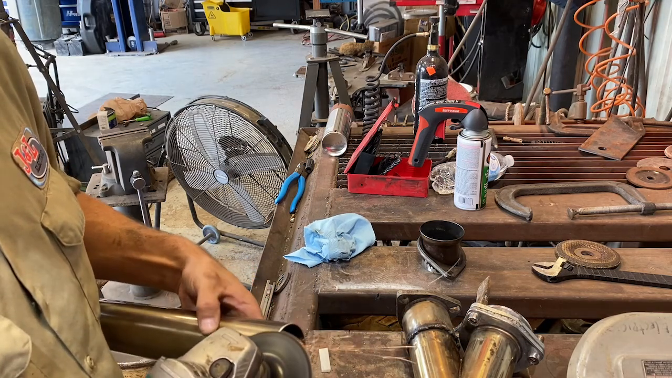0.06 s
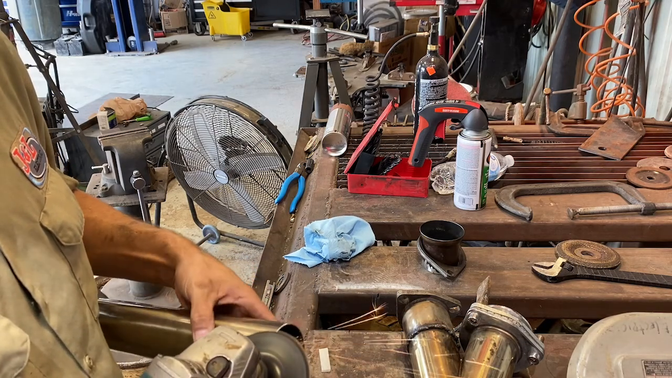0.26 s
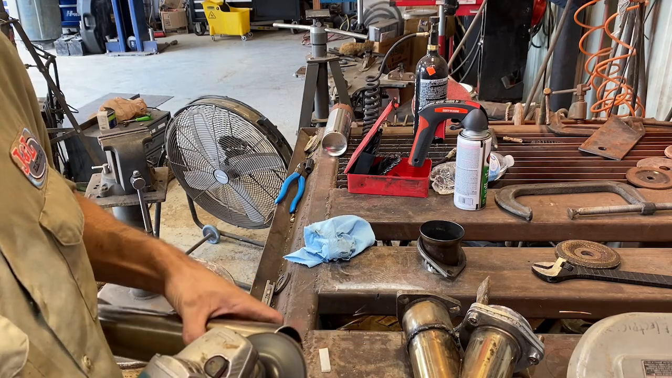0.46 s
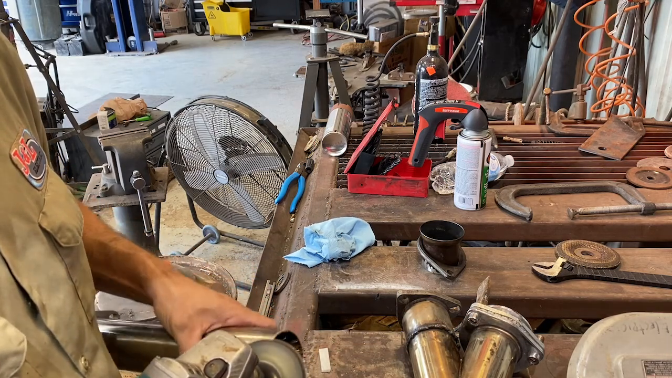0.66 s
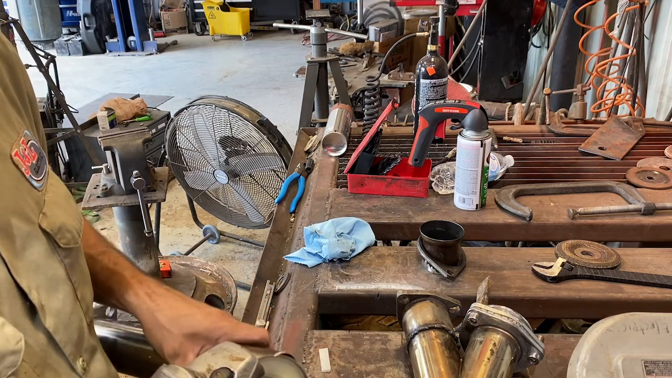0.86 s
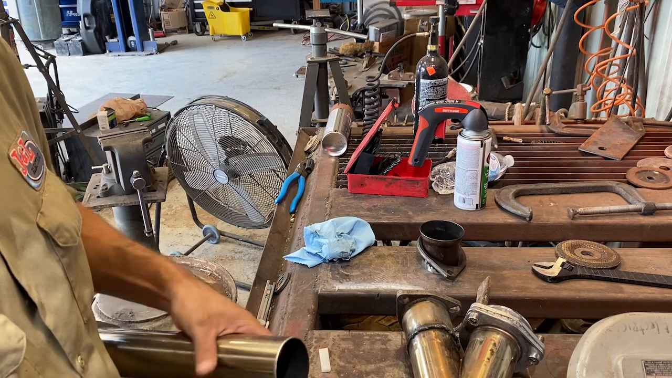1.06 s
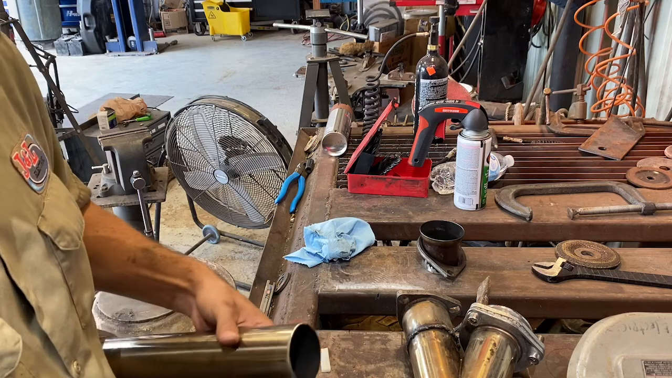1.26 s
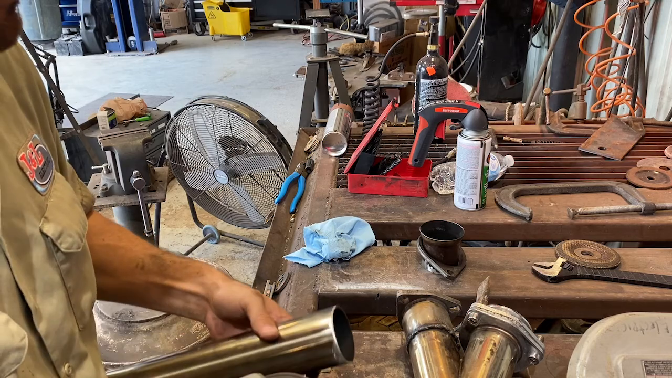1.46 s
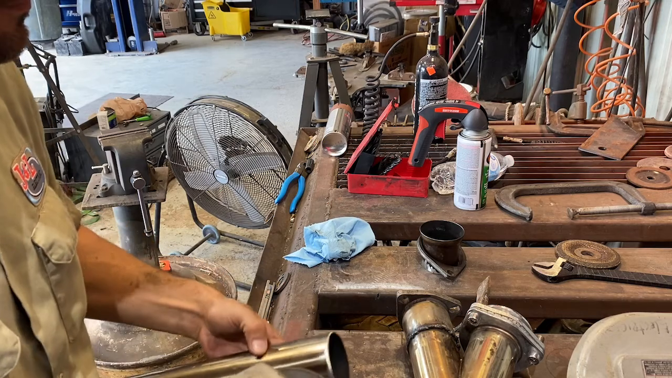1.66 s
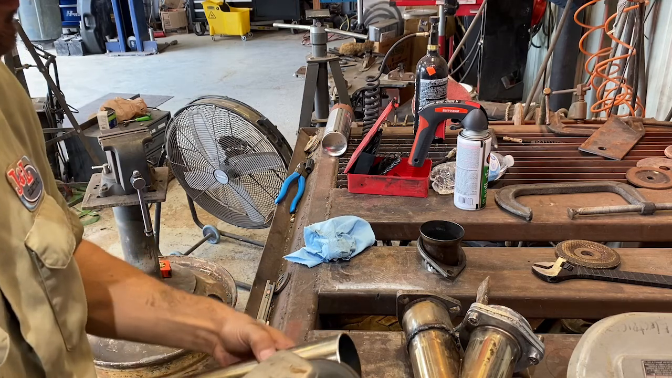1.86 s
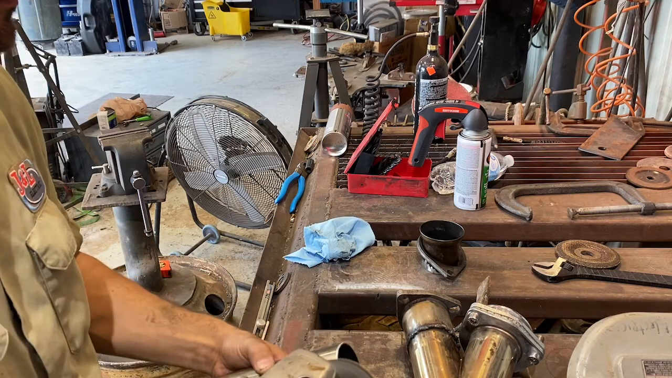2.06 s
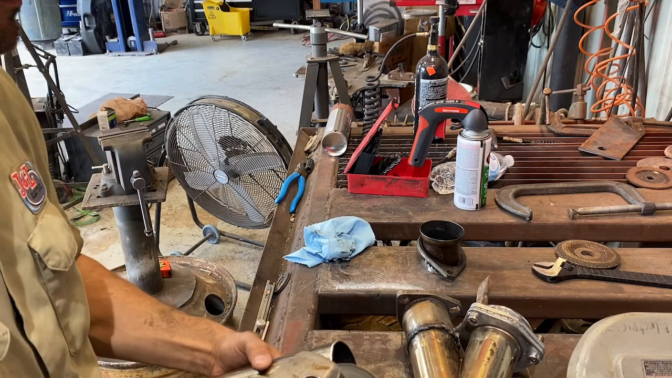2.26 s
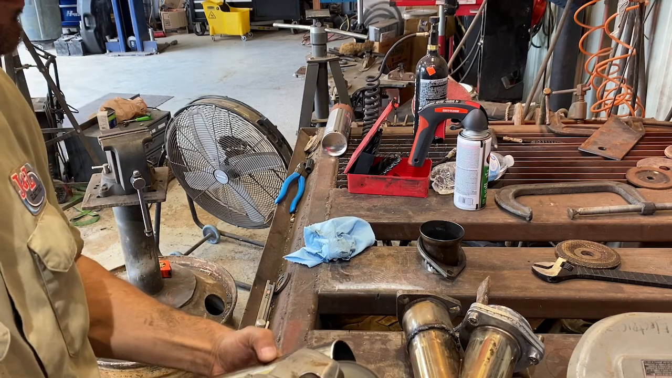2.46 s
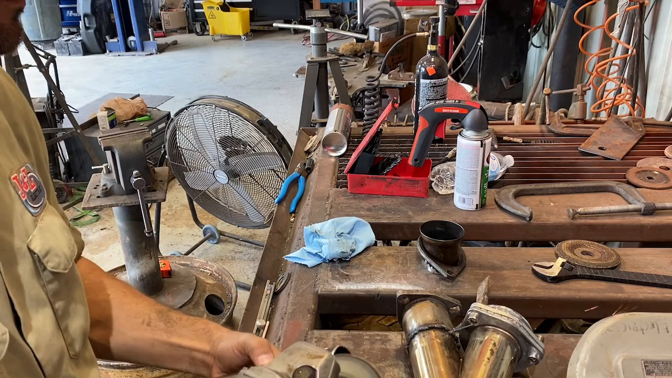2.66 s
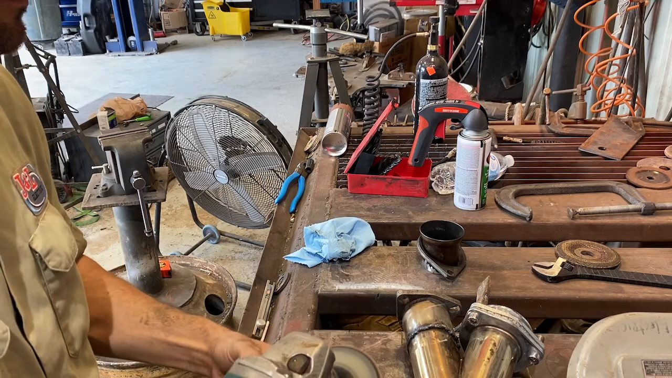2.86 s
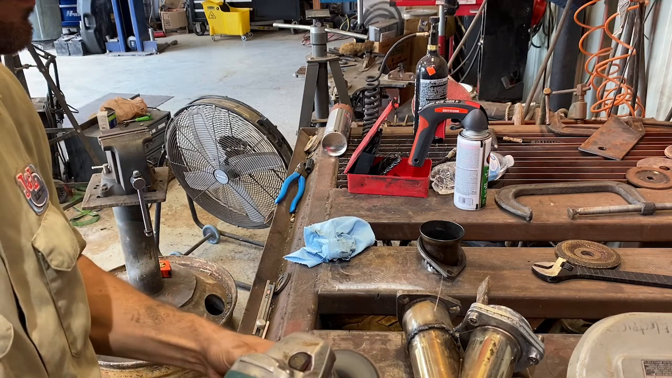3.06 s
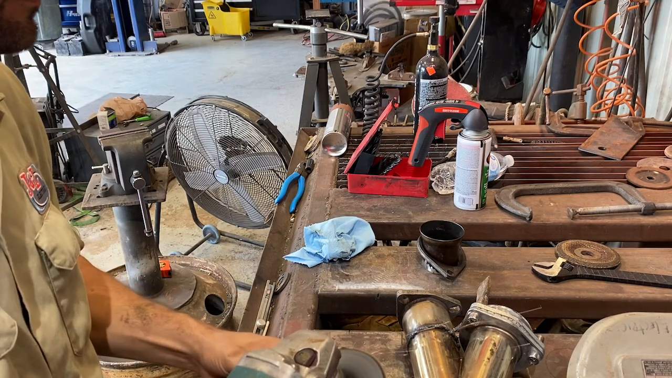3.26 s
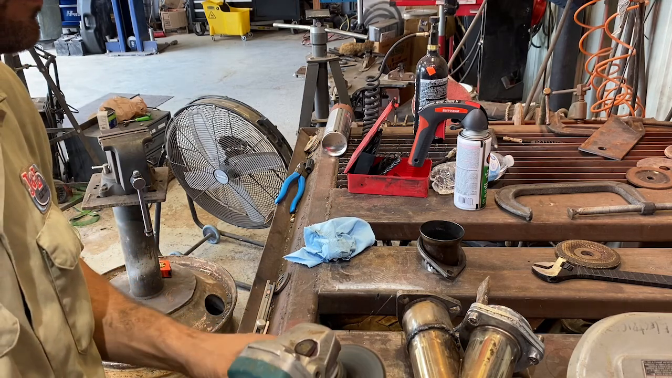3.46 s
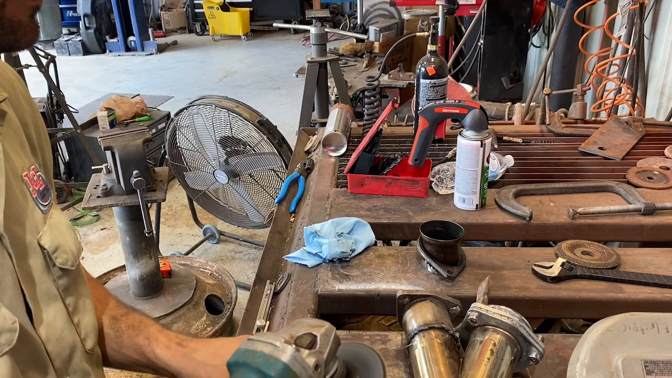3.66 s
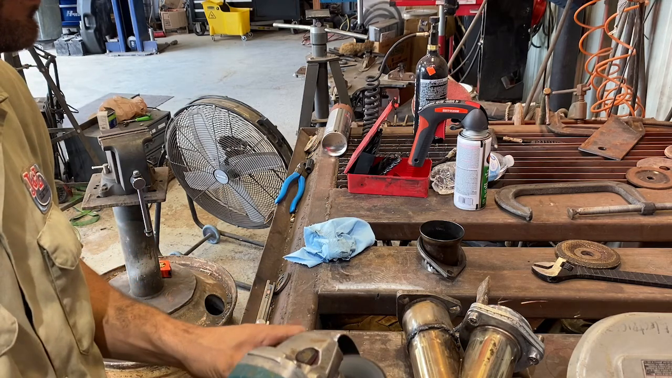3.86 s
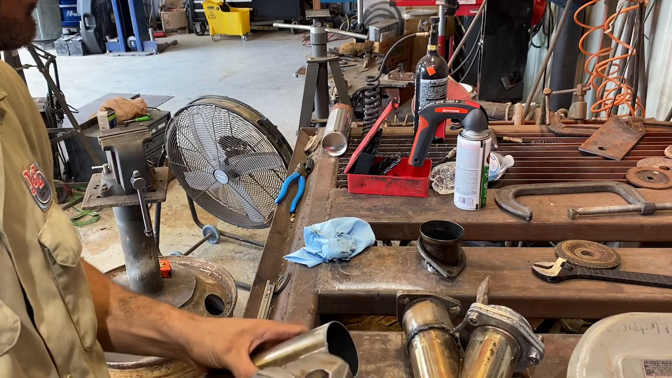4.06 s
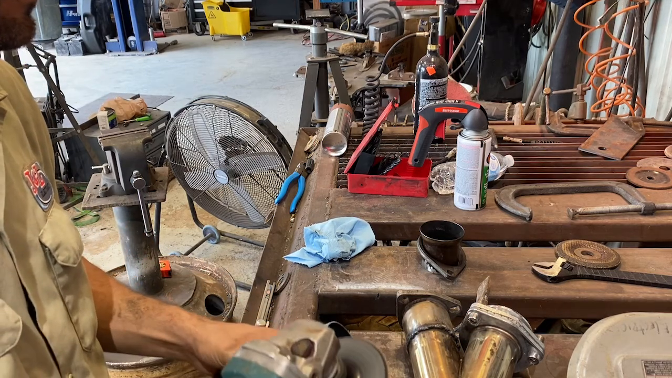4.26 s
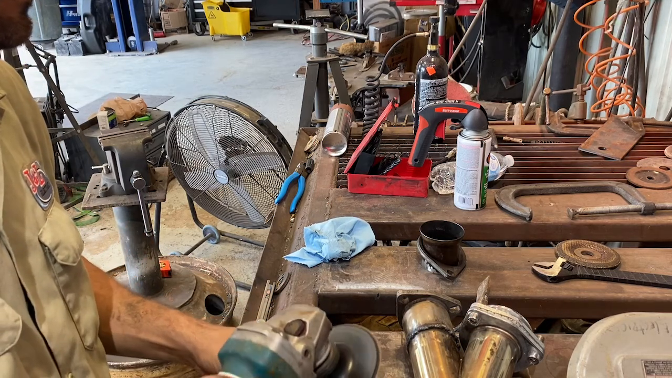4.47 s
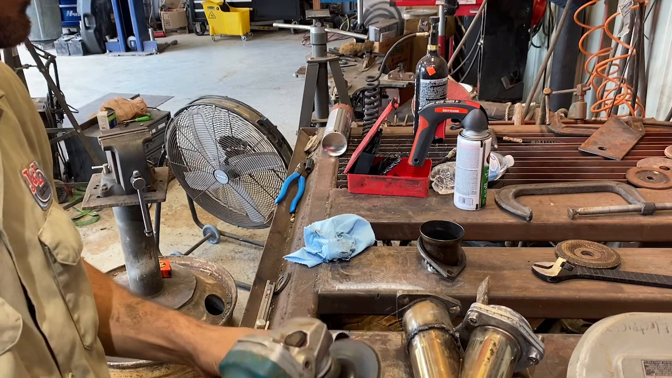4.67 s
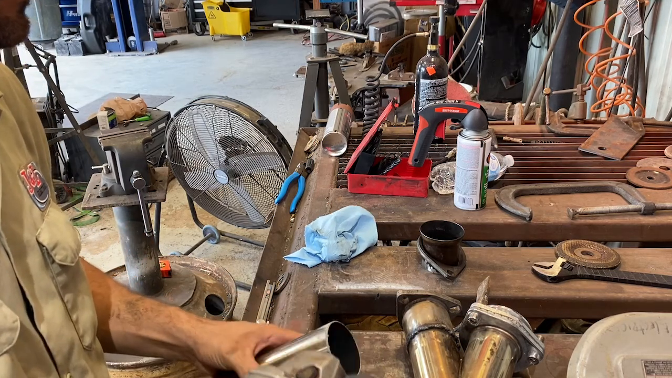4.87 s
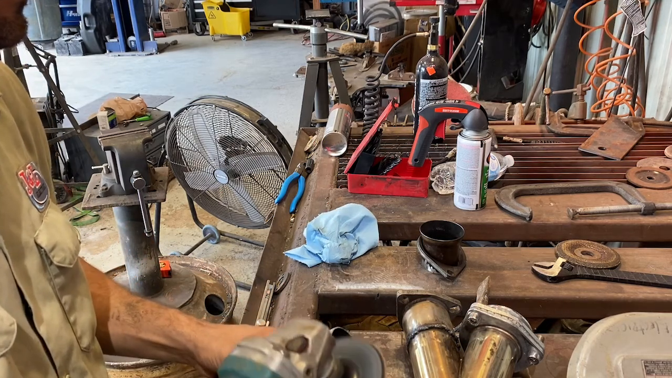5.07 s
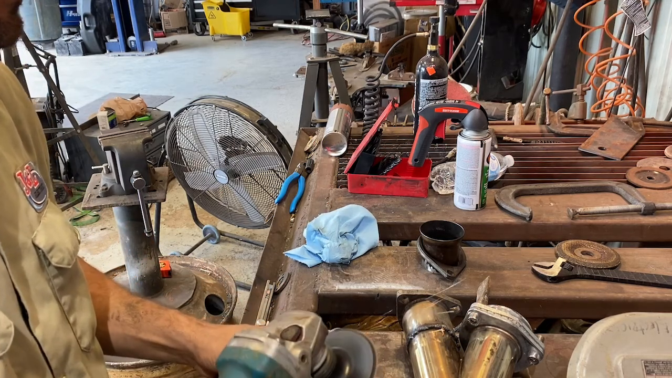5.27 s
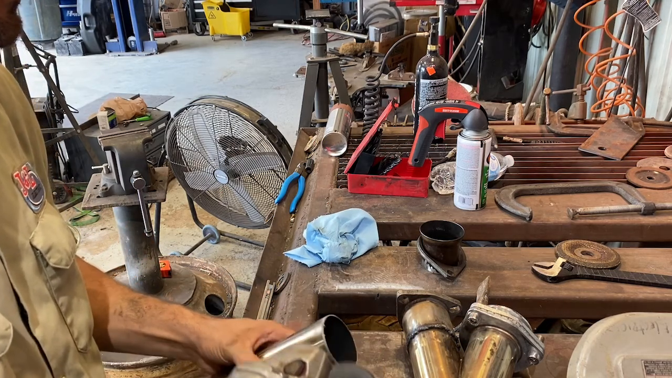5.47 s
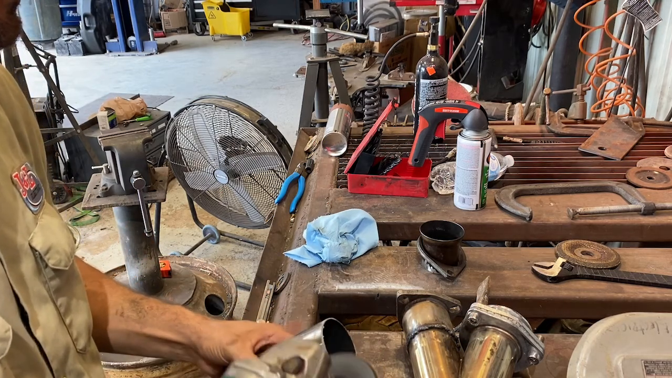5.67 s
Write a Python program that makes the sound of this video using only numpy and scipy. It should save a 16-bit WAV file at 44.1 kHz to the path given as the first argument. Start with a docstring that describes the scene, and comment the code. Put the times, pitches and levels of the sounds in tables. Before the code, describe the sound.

Close in a workshop, a running angle grinder is already pressed on a steel pipe, hissing bright and gritty. It lifts, leaving rushing cooling air and a fluttering gear rattle. A longer, harsher pass bites in, rings and stutters, then lifts. A dull bump follows, then two brief scrapes, ending on free-running roar. Stereo microphone nearby, with slight wind rumble.

```python
"""In a workshop, an angle grinder at speed is laid on a steel pipe in four hissing passes, one already under way.
Grit recurring at every turn of the disc makes the hiss a comb of lines, which sags as pressure brakes the disc.
This contact force is coloured by the pipe wall and excites the decaying modes of the pipe; the disc bites and skips.
Filtered noise makes the roar of cooling air, a rattling gear head, gusts on the microphone and a bump on the bench;
tones of wandering phase make the motor whine, the hum of the spinning parts and a shop fan."""
import sys
import numpy as np
from scipy import signal
from scipy.fft import rfft, irfft
from scipy.io import wavfile
from scipy.ndimage import uniform_filter1d, map_coordinates

SR = 44100
rng = np.random.default_rng(int(sys.argv[2]) if len(sys.argv) > 2 else 0)


def master(y):
    """Save y as 16-bit WAV."""
    cut = np.clip(np.atleast_2d(y).T, -1, 1)
    pcm = np.round(cut * 32767)  # scale
    wavfile.write(sys.argv[1], SR, pcm.astype(np.int16))


N = 252252
TIME, FREQ = np.arange(N) / SR, np.fft.rfftfreq(N, 1 / SR)

# Levels in the tables are relative; the functions apply further gains.
# The disc on the pipe: lands t/s, pressed hardest t/s, lets up t/s, clear t/s, hand eases by level/dB, over t/s,
# grit hiss level/dB, pipe wall level/dB, push of the warped disc level/dB (against the wall)
PASS_TABLE = [(-.3, 0.2, .795, .87, 4.5, .6, -24, -32.8, -8),
              (2.3, 2.78, 3.82, 3.92, 3.5, .08, -23, -30.6, -8),
              (4.599, 4.70, 4.74, 4.82, 0, .08, -26.3, -33, -6),
              (5.205, 5.27, 5.355, 5.445, 0, .08, -23.8, -32.5, -6)]
# Colour of the spot of pipe met by each pass, one list a pass: f/Hz, density level/dB (per Hz)
SPOT_COLOURS = [
    [(150, -44), (330, -20.5), (600, -17.5), (1000, -14.5), (1750, -12), (2350, -4.5), (2800, -17),
     (3300, -1.5), (4000, -11.5), (5400, -3), (6700, -4.5), (8600, -3.5), (11000, 2.5), (15300, -6)],
    [(150, -27), (330, -18), (600, -26), (1000, -5), (1750, -8.5), (2350, 7.5), (2800, -3), (3300, -1),
     (4000, -4.5), (4700, -8.5), (5400, -4.5), (6700, -3), (8600, -9.5), (11000, 0), (15300, -10)],
    [(150, -41), (330, -16), (600, -22), (1000, -7), (1750, -3), (2350, 3.5), (2800, 1), (3300, 0),
     (4000, 1.5), (5400, -1), (6700, 1), (8600, -6.5), (11000, 6.5), (15300, -6)],
    [(150, -29), (330, -43), (600, -25), (1000, -7), (1750, -9), (2350, 4.5), (2800, -2), (3300, -2),
     (4000, -7.5), (5200, 0), (5750, -4), (6900, 0), (8600, -6), (11000, 2.5), (15300, -7)],
]
# The disc bites into the steel: t/s, hiss level/dB, pipe wall level/dB, decay time constant t/s
BITE_TABLE = [(0.0, -41, -38.5, 0.11), (2.253, -21, -27.5, 0.018), (2.798, -23.5, -43, 0.019),
              (4.591, -21, -33, 0.018), (5.185, -17, -24.5, 0.0063), (5.219, -28, -51, 0.0075)]
# Modes of the pipe: f/Hz, level/dB, t60 t/s
PIPE_MODES = [(448, -37, 0.055), (589, -27, 0.023), (774, -28, 0.22), (2025, -19, 0.076), (2230, -22, 0.2),
              (2386, -23.5, 0.18), (2550, -7.5, 0.16), (3580, -16, 0.13), (5220, -21, 0.013)]
# Push of the slightly warped disc: multiple of disc speed, level/dB
WARP_ORDERS = [(2, -13), (3, -6.5), (4, -6), (5, -7.5)]
# Lightly held, the disc skips on the pipe: t/s, half length t/s, more slap level/dB, more bounce level/dB
SKIP_TABLE = [(0.835, 0.016, 11, -3), (2.836, 0.051, 1, 3.5), (3.235, 0.045, 5.5, 3.5),
              (3.43, 0.083, 3, 2.5), (3.604, 0.13, 3, 9)]
# Chips torn loose blur the comb of lines into a rasp: t/s, half length t/s, more chips level/dB
RASP_TABLE = [(2.26, .03, 15), (2.74, .06, 16), (3.63, .1, 17), (4.605, .035, 19), (5.195, .03, 18),
              (5.31, .07, 8)]
# Single resonances of the wall swell and fade as the contact creeps along:
# t/s, half length t/s, f/Hz, half width f/Hz, lift level/dB
WALL_SWELLS = [(0.066, 0.08, 3320, 90, 4.5), (0.57, 0.34, 3300, 73, 2.5), (0.69, 0.36, 2070, 60, 6.5),
               (0.12, 0.2, 2240, 56, 0), (0.024, 0.06, 3760, 80, 10), (0.073, 0.056, 2860, 130, 18.5),
               (.14, 0.5, 5930, 130, 11), (.1, .12, 4900, 200, 0), (0.35, 0.19, 5300, 92, 9),
               (0.2, .12, 4300, 100, 4), (0.56, .1, 5900, 70, 6), (.76, .08, 4300, 200, 4),
               (2.357, 0.074, 2430, 110, 9), (2.6, .2, 700, 120, 3), (3.81, 0.068, 770, 120, 15),
               (3.35, .15, 2270, 120, 4), (2.498, .06, 7200, 160, 14), (2.653, 0.044, 5100, 110, 8),
               (2.72, 0.041, 2600, 150, 2), (2.728, 0.055, 5130, 280, 8), (2.8, 0.07, 6560, 160, 8.5),
               (3, 0.35, 3300, 90, 8), (3.1, 0.25, 4800, 100, 9), (3.12, 0.083, 4240, 80, 15.5),
               (3.07, 0.15, 2570, 83, 6.5), (3.39, .07, 5820, 115, 6), (3.38, 0.16, 8400, 300, 5),
               (3.58, 0.088, 6850, 340, 4), (3.734, 0.022, 4900, 350, 9), (3.823, .05, 3500, 150, 9),
               (3.5, .04, 4550, 130, 10), (3.863, 0.034, 2320, 170, 17), (4.61, 0.029, 5600, 223, 6),
               (5.5, 0.047, 4200, 100, 12), (4.77, 0.027, 2400, 150, 16), (4.7, 0.048, 780, 91, 12),
               (5.246, 0.06, 5500, 150, 12.5), (5.34, 0.045, 760, 90, 14.5), (5.39, .05, 2410, 150, 7.5)]
# Level of the rattling gear head: t/s, level/dB
RATTLE_LEVEL = [(0, -49), (1.35, -43), (1.45, -40), (1.65, -40), (1.9, -43), (2.08, -41), (2.3, -42),
                (4.0, -45.5), (4.35, -49), (4.9, -45), (5.72, -44.5)]
# Colour of the rattle: f/Hz, density level/dB (per Hz)
RATTLE_COLOUR = [(3500, -55), (5000, -4.5), (5350, 0), (5700, 2), (6050, -16), (8500, -52)]
# Cooling air as the grinder is turned towards the microphone or away: t/s, level/dB, treble level/dB
AIR_LEVEL = [(0, -32, 6), (.35, -36.5, 9.5), (.88, -36.5, 1.5), (1.35, -36, 4), (1.43, -33.5, 4),
             (2.2, -31.5, -0.3), (2.72, -32, -3), (2.85, -35, 5), (3.55, -35.5, 4), (4.38, -35.5, -2),
             (4.47, -33, 0), (5.72, -32.5, -1)]
# Colour of the cooling air: f/Hz, density level/dB (per Hz)
AIR_SPECTRUM = [(100, -13), (280, -11.5), (470, -3), (620, -3), (800, 0.5), (1250, 3.5), (1800, 2),
                (2600, 3), (4500, 0.5), (5500, -3), (6300, -1), (7300, 0), (9800, -7.5), (11600, -3.5),
                (12400, -2.5), (15300, -5.5)]
# Two resonances of the air jet, moving as the grinder is turned:
# t/s, howl f/Hz, howl level/dB, whistle f/Hz, whistle level/dB
JET_RESONANCES = [(0, 1180, -16, 11860, -16), (.95, 1110, -12.5, 11500, -10.5),
                  (1.5, 1210, -8.5, 11550, -9), (2.2, 1270, -12.5, 11780, -11),
                  (3.3, 1200, -18, 10650, -31), (4.1, 1180, -15, 10100, -9), (4.9, 1250, -15, 10000, -9),
                  (5.72, 1220, -14.5, 10330, -9.5)]
# Motor whine: multiple of disc speed, level/dB (against the air), width f/Hz
WHINE_LINES = [(5, -23, 25), (27.4, -19, 120), (44, -20, 40)]
# Hum of the spinning parts; the armature is geared to turn 3.69 times as fast as the disc:
# multiple of disc speed, level/dB, width f/Hz
HUM_LINES = [(3, -64, 3), (3.692, -55.3, .2)]
# Shop fan: f/Hz, level/dB, width f/Hz
FAN_LINES = [(150, -68.5, 0.71)]
# Colour of the low draught: f/Hz, density level/dB (per Hz)
DRAUGHT_COLOUR = [(15, -40), (40, -36), (65, 4), (110, -9), (250, -3), (1000, -59)]
# The air jet buffets the microphone: t/s, half length t/s, level/dB
GUST_TABLE = [(1.493, 0.091, -59), (2.017, 0.27, -63), (2.478, 0.094, -52.5), (2.888, 0.098, -50),
              (3.14, 0.2, -61), (4.296, .03, -63)]
# Colour of the gusts: f/Hz, density level/dB (per Hz)
GUST_SPECTRUM = [(15, -18), (35, -14), (62, 3.5), (110, -4), (200, -25), (500, -44), (2000, -80)]
# The pipe is shifted against the bench: t/s, level/dB, decay time constant t/s
BUMP_TABLE = [(4.185, -45, 0.051)]
# Colour of the bump: f/Hz, density level/dB (per Hz)
BUMP_SPECTRUM = [(60, -24), (180, -2.5), (270, 7), (420, 0), (1200, -9), (5000, -50)]
# Microphone pair: f/Hz, energy share of direct sound, left-right level/dB, phase by which left leads [rad]
PORT_TABLE = [(40, .92, 0, 0), (130, .9, 0, 0), (300, .8, 1.5, .15), (650, .66, 3, .4),
              (1300, .72, 3.5, .8), (2600, .68, 2, 1.2), (4400, .45, 5, .6), (5600, .5, 4, 1.5),
              (7000, .86, 1.5, 0), (9100, .97, 0, -3.14), (11100, .88, 0, -6.28), (13200, .97, 0, -9.42),
              (15300, .94, 0, -12.5)]
# Reverberation of the shop: f/Hz, t60 t/s
ROOM_DECAY = [(100, 0.38), (1500, 1), (5000, 0.31), (15000, 0.035)]

# The disc turns freely at one speed; a pass is already braking it at the start
FREE_TURNS_PER_S, START_TURNS_PER_S = 158.8, 150.8
# Full pressure would take this much off the speed, which follows slowly
SAG_TURNS_PER_S, INERTIA_S, LOAD_POWER = 21.7, 1.43, 1.19
# Pressure starts light and swells, then falls away as the disc lifts
LANDING_DB, SWELL_POWER = -9, 1.3
LIFT_DB, LIFT_POWER = -22, 1.1
WALL_SHARE = 0.82  # the pipe wall follows the pressure less than the hiss does
SLAP_DB, BOUNCE_DB = -0.5, -2  # pressure swings once a turn, and once every second turn
STUMBLE_TURNS, STUMBLE_SHARE = .1, .15  # the bounces are uneven in timing and in strength
WALL_FADE_DB_PER_S, WALL_SKIP_SHARE = 2, 0.44  # the wall fades along a pass, and sounds less in a bounce
WARP_FADE_DB_PER_S = 7  # the warp pushes hardest just after landing, before the disc settles
BITE_RISE_S = .0015
# Narrow resonances come and go at random under the moving contact: rms depth, knot spacings
GLINT_DB, GLINT_HZ, GLINT_S = 1.5, 200, .2
EDGE_HZ = 15900  # upper band limit


def amp(db):
    """Level: an amplitude ratio is ten to the power of dB / 20."""
    return 10 ** (np.asarray(db) / 20)


def unit(x):
    """Normalization: scales a signal to rms 1."""
    return x / np.sqrt(np.mean(x ** 2) + 1e-20)


def follow(rows, at=TIME):
    """Linear interpolation: joins table rows by straight lines, one curve a column."""
    key, *columns = np.transpose(rows)
    return [np.interp(at, key, column) for column in columns]


def read(points, hz):
    """Spectral interpolation: straight lines on a logarithmic frequency axis."""
    f, value = np.transpose(points)
    return np.interp(np.log(hz + 1), np.log(f), value)


def noise(colour):
    """Filtered noise: a white spectrum weighted by the given colour, at rms 1."""
    white = rng.standard_normal(N)
    return unit(irfft(rfft(white) * amp(read(colour, FREQ)), N))


def split(x, hz):
    """Complementary filtering: the parts below and above a frequency add up to the whole."""
    low = irfft(rfft(x) / (1 + (FREQ / hz) ** 8), N)
    return low, x - low


def band_rms(x, lo, hi):
    """Band level: rms of the part between two frequencies."""
    return np.std(irfft(rfft(x) * ((FREQ > lo) & (FREQ < hi)), N))


def bell(centre, half_width, at=TIME):
    """Gaussian curve: a smooth rise and fall of height 1 around a moment or a frequency."""
    return np.exp(-((at - centre) / half_width) ** 2)


def ramp(start_s, end_s):
    """Linear transition from 0 to 1 between two moments."""
    return np.clip((TIME - start_s) / max(end_s - start_s, 1 / SR), 0, 1)


def blows(rows, rise_s):
    """Impact envelope: quick rises times exponential decays."""
    total = 0
    for start_s, db, decay_s in rows:
        age = np.maximum(TIME - start_s, 0)
        total = total + amp(db) * (1 - np.exp(-age / rise_s)) * np.exp(-age / decay_s)
    return total


def tone(hz, width_hz):
    """Phase diffusion: a random walk of phase broadens a line, here of rms 1."""
    drift = np.sqrt(2 * np.pi * width_hz / SR) * rng.standard_normal(N)
    phase = np.cumsum(2 * np.pi * hz / SR + uniform_filter1d(drift, size=400))
    return np.sqrt(2) * np.sin(phase)


def resonant_noise(hz, width_hz):
    """Resonance: slow complex noise, shifted up to the moving frequency hz, at rms 1."""
    keep = np.exp(-np.pi * width_hz / SR)
    white = rng.standard_normal(N) + 1j * rng.standard_normal(N)
    slow = signal.lfilter([1], np.poly([keep, keep]), white)
    return unit((slow * np.exp(2j * np.pi * np.cumsum(hz) / SR)).real)


def patches(knots_hz, knots_s):
    """Random field: bounded random heights joined smoothly over frequency and time."""
    heights = np.sqrt(3) * rng.uniform(-1, 1, (128, 128))
    return map_coordinates(heights, np.meshgrid(knots_hz, knots_s, indexing="ij"))


def pressure(lands, hardest, lets_up, clear, ease_db, ease_s):
    """Hand force of a pass: light landing, swell, easing, lift; gives contact (0-1) and pressure in dB."""
    touching = uniform_filter1d(1. * ((TIME >= lands) & (TIME <= clear)), size=200)
    swell = LANDING_DB * (1 - ramp(lands, hardest)) ** SWELL_POWER
    ease = ease_db * ramp(hardest, hardest + ease_s)
    lift = LIFT_DB * ramp(lets_up, clear) ** LIFT_POWER
    return touching, swell - ease + lift


def disc_speed():
    """Rotor inertia: braking by pressure makes the speed in turns per second sag and recover slowly."""
    load = 0
    for *hand, grit_db, pipe_db, warp_db in PASS_TABLE:
        touching, press_db = pressure(*hand)
        load = load + touching * amp(press_db) ** LOAD_POWER
    keep = np.exp(-1 / (INERTIA_S * SR))
    goal = FREE_TURNS_PER_S - SAG_TURNS_PER_S * load
    return signal.lfilter([1 - keep], [1, -keep], goal, zi=[START_TURNS_PER_S])[0]


def rim(turns, life_turns, size):
    """Periodicity with wear: `size` random bumps round the disc slowly renew; 320 cells in the row of a turn."""
    keep = np.exp(-1 / life_turns)
    fresh = rng.standard_normal((1000, size))[:int(turns[-1]) + 3]
    worn = signal.lfilter([np.sqrt(1 - keep ** 2)], [1, -keep], fresh[1:], axis=0, zi=keep * fresh[:1])[0]
    return signal.resample(worn, 320, axis=1)


def skipping():
    """Intermittent contact: extra slap and bounce of the disc in dB while it skips."""
    return sum(np.outer([slap_db, bounce_db], bell(s, half_s)) for s, half_s, slap_db, bounce_db in SKIP_TABLE)


def scrape(turns, patchy_db=1.0, grain_db=4.5, chips_db=-23, crackle_db=2, abruptness=1.6):
    """Contact force: recurring grit gives lines, fresh chips give noise, and the riding disc modulates both."""
    grit = rim(turns, life_turns=90, size=320)
    high_spots = rim(turns, life_turns=40, size=12)
    coarse_grains = rim(turns, life_turns=25, size=80)
    # evenly strewn grit gives all multiples of the speed a like strength
    orders = rfft(grit * amp(patchy_db * high_spots + grain_db * coarse_grains), axis=1)
    profile = irfft(orders / abs(orders) ** .88, axis=1)
    cells = turns * profile.shape[1]
    force = unit(map_coordinates(profile.ravel(), [cells], order=3, mode="nearest"))

    slap_db, bounce_db = skipping()
    late, harder = [map_coordinates(row, [turns]) for row in rng.standard_normal((2, 1000))]
    airborne = np.tanh(abruptness * np.cos(np.pi * (turns + STUMBLE_TURNS * late)))
    ride_db = (SLAP_DB + slap_db) * np.cos(2 * np.pi * turns) - (BOUNCE_DB + bounce_db) * airborne
    ride = amp(ride_db + STUMBLE_SHARE * bounce_db * harder)

    loose = amp(chips_db + sum(db * bell(s, half_s) for s, half_s, db in RASP_TABLE))
    hiss = rng.standard_normal(N)
    crackle = unit(uniform_filter1d(rng.standard_normal(N), size=40))
    chips = unit(hiss * amp(crackle_db * crackle))
    mixed = (force + loose * chips) / np.hypot(1, loose)
    # dividing by the rms over 40 ms keeps the mean power of the ride steady
    return mixed * ride / np.sqrt(uniform_filter1d(ride ** 2, size=1764))


def sliding(force, shift_db=1.2, shift_hz=800, shift_s=.06, tremor_db=.8, tremor_s=.02):
    """Moving excitation point: creeping shifts the colour in wide and narrow patches, and the hand trembles."""
    hz, t, z = signal.stft(force, SR, nperseg=768)
    wide = patches(hz / shift_hz, t / shift_s)
    narrow = patches(hz / GLINT_HZ, t / GLINT_S)
    tremor = map_coordinates(rng.standard_normal(600), [t / tremor_s])
    gain_db = shift_db * wide + GLINT_DB * narrow + tremor_db * tremor
    return signal.istft(z * amp(gain_db), SR, nperseg=768)[1][:N]


def wobble(turns):
    """Forced vibration: the slightly warped disc pushes at low multiples of its speed."""
    return np.sqrt(2) * sum(amp(db) * np.cos(2 * np.pi * multiple * turns) for multiple, db in WARP_ORDERS)


def ring(force):
    """Modal response: the force convolved with the decaying modes of the pipe."""
    t = TIME[:SR // 2]
    modes = 0
    for hz, db, t60 in PIPE_MODES:
        modes = modes + amp(db) * unit(amp(-60 * t / t60) * np.cos(2 * np.pi * hz * t))
    return signal.fftconvolve(force, modes / np.sqrt(len(t)))[:N]


def swelling(x):
    """Selective excitation: each wall resonance is lifted while the contact passes the spot that excites it."""
    hz, t, z = signal.stft(x, SR, nperseg=1024)
    lift_db = 0
    for s, half_s, centre_hz, width_hz, db in WALL_SWELLS:
        lift_db = lift_db + db * np.outer(bell(centre_hz, width_hz, hz), bell(s, half_s, t))
    return signal.istft(z * amp(lift_db), SR, nperseg=1024)[1][:N]


def grinding(speed, hiss_db=2.5, wall_db=-1, ring_db=-2):
    """Source and resonator: each scrape hisses at the contact, sounds through the wall and rings the pipe."""
    turns = np.cumsum(speed) / SR
    force, warp, bounce_db = sliding(scrape(turns)), wobble(turns), skipping()[1]
    out, push, last_clear = np.zeros(N), np.zeros(N), -np.inf
    for row, spot in zip(PASS_TABLE, SPOT_COLOURS):
        *hand, grit_db, pipe_db, warp_db = row
        lands, clear = row[0], row[3]
        touching, press_db = pressure(*hand)
        since_landing = TIME - lands
        bites = [bite for bite in BITE_TABLE if last_clear < bite[0] <= clear]

        hiss = touching * amp(grit_db + press_db)
        hiss += blows([(s, db, decay) for s, db, _, decay in bites], BITE_RISE_S)
        loss_db = WALL_FADE_DB_PER_S * since_landing + WALL_SKIP_SHARE * bounce_db
        wall = touching * amp(pipe_db + WALL_SHARE * press_db - loss_db)
        wall += blows([(s, db, decay) for s, _, db, decay in bites], BITE_RISE_S)

        sound = irfft(rfft(force) * amp(read(spot, FREQ)), N)
        low, high = split(sound, hz=4530)
        out += amp(hiss_db) * hiss * high / band_rms(sound, 5000, 12500)
        out += amp(wall_db) * wall * low / band_rms(sound, 2000, 4500)
        warp_level_db = pipe_db + warp_db - WARP_FADE_DB_PER_S * np.maximum(since_landing, 0)
        push += wall * force + touching * amp(warp_level_db) * warp
        last_clear = clear
    return swelling(out + amp(ring_db) * ring(push))


def chatter(speed, uneven_db=1.0, sharpness=9, wander=0.06):
    """Amplitude modulation: the gear head rattles about once in four turns, a fluttering chirr."""
    sway = unit(uniform_filter1d(rng.standard_normal(N), size=2000))
    beat = np.cumsum(speed / 4 * (1 + wander * sway)) / SR
    bursts = np.exp(sharpness * np.cos(2 * np.pi * beat)) * amp(uneven_db * sway)
    return amp(follow(RATTLE_LEVEL)[0]) * unit(bursts * noise(RATTLE_COLOUR))


def motor(speed, air_db=-1.12, rush_db=1.5, howl_width_hz=260, whistle_width_hz=1200):
    """Flow noise: cooling air roars through the duct and howls at the vents; a faint whine follows the speed."""
    level_db, treble_db = follow(AIR_LEVEL)
    howl_hz, howl_db, whistle_hz, whistle_db = follow(JET_RESONANCES)
    roar, rush = split(noise(AIR_SPECTRUM), hz=2720)
    body, treble = split(roar + amp(rush_db) * rush, hz=4860)
    howl = amp(howl_db) * resonant_noise(howl_hz, howl_width_hz)
    whistle = amp(whistle_db) * resonant_noise(whistle_hz, whistle_width_hz)
    whine = sum(amp(db) * tone(multiple * speed, width) for multiple, db, width in WHINE_LINES)
    air = body + howl + amp(treble_db) * (treble + whistle)
    return amp(air_db + level_db) * (air + whine)


def hum(speed):
    """Unbalance of armature and disc: low tones that sink under load and climb when the disc runs free."""
    return sum(amp(db) * tone(multiple * speed, width) for multiple, db, width in HUM_LINES)


def shop_fan(draught_db=-68):
    """Stationary background: a steady hum and the low noise of a draught."""
    fan_hum = sum(amp(db) * tone(hz, width) for hz, db, width in FAN_LINES)
    return fan_hum + amp(draught_db) * noise(DRAUGHT_COLOUR)


def gusts(calm_db=-73):
    """Wind noise: the air jet buffets the microphone with low noise that swells over a calm floor."""
    wind = amp(calm_db) + sum(amp(db) * bell(s, half_s) for s, half_s, db in GUST_TABLE)
    return wind * noise(GUST_SPECTRUM)


def bench_bump():
    """Impact noise: a dull decaying burst as the pipe shifts against the bench."""
    return blows(BUMP_TABLE, rise_s=0.0043) * noise(BUMP_SPECTRUM)


def workshop(x, near_db=7, near_s=0.0095):
    """Reverberation at one port: dense echoes off the bench and tools, then the decaying tail of the room."""
    hz, t, z = signal.stft(rng.standard_normal(SR // 2), SR, nperseg=256)
    late_decay = amp(-60 * t / read(ROOM_DECAY, hz)[:, None])
    near_echoes = amp(near_db) * np.exp(-t / near_s)
    arrived = t > .004
    decay = late_decay * (1 + near_echoes) * arrived
    # every band of the tail gets like energy
    tail = signal.istft(z * decay / np.linalg.norm(decay, axis=1, keepdims=True), SR, nperseg=256)[1]
    return signal.fftconvolve(x, tail / np.linalg.norm(tail))[:N]


def scene():
    """Superposition: all sources reach two ports, directly with a phase difference and scattered by the shop."""
    speed = disc_speed()
    metal = grinding(speed) + chatter(speed)
    sound = metal + motor(speed) + hum(speed) + gusts() + bench_bump() + shop_fan()
    direct, balance_db, lead = follow(PORT_TABLE, FREQ)
    direct = np.clip(direct, 0, 1)
    ports = []
    for side in (1, -1):  # left, right
        straight = np.sqrt(direct) * rfft(sound) * np.exp(.5j * side * lead)
        # turbulent air is a wide source: each port also hears eddies of its own
        around = workshop(metal) + motor(speed) + gusts() + bench_bump()
        scattered = np.sqrt(1 - direct) * rfft(around)
        ports.append(irfft((straight + scattered) * amp(side * balance_db / 2), N))
    return np.array(ports)


def record(dry):
    """Band limitation: a linear-phase low-pass filter, as of a recorder."""
    lowpass = signal.firwin(511, EDGE_HZ, window=("kaiser", 9), fs=SR)
    return signal.oaconvolve(dry, lowpass[None], "same")


dry = scene()
out = record(dry)
master(out)
```